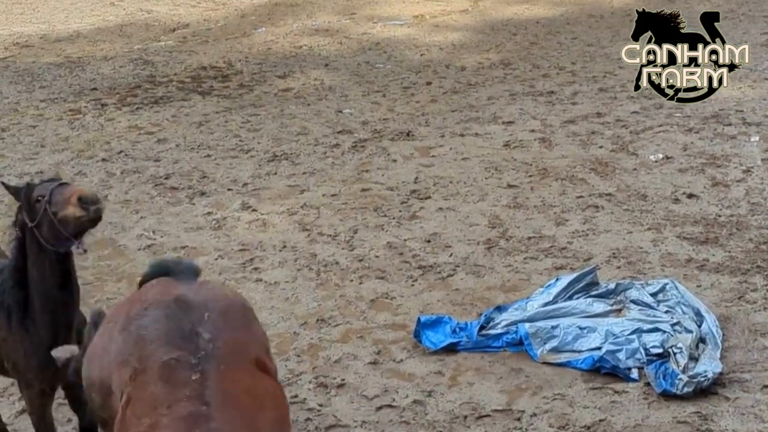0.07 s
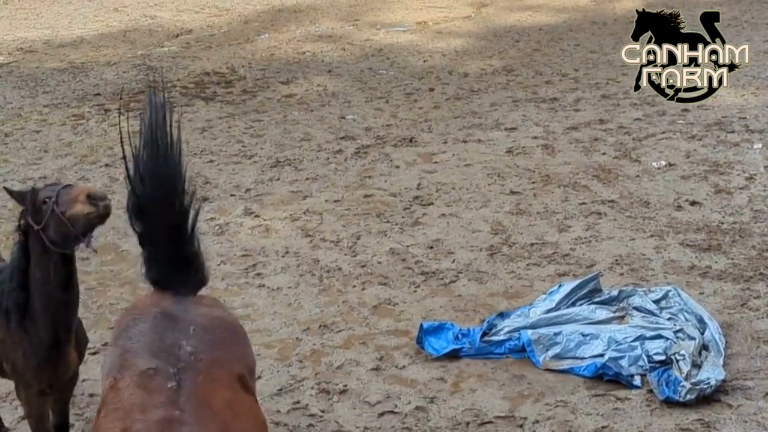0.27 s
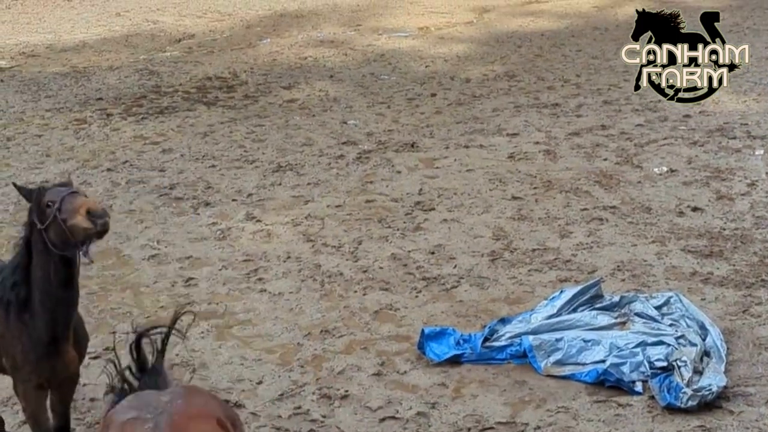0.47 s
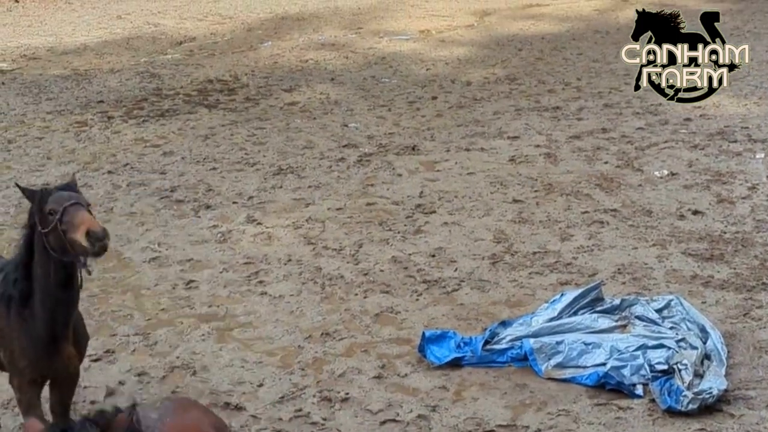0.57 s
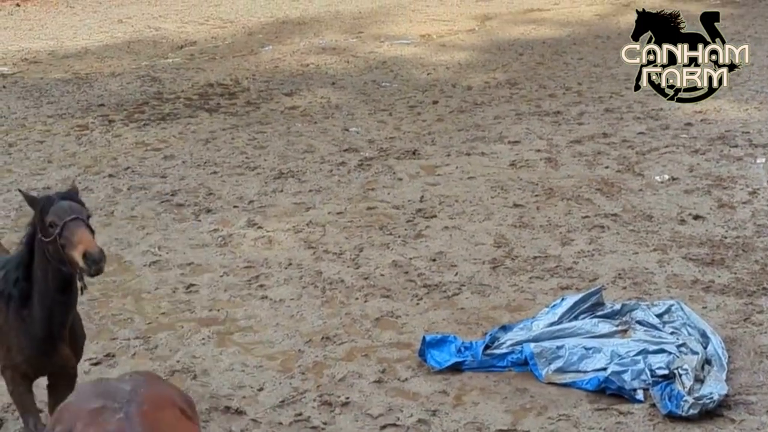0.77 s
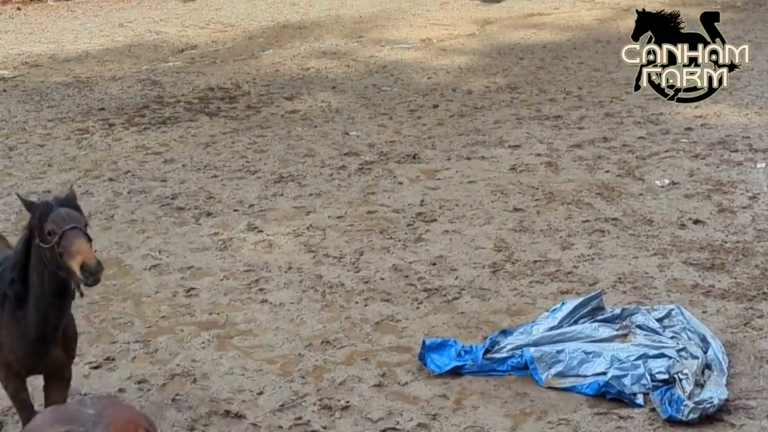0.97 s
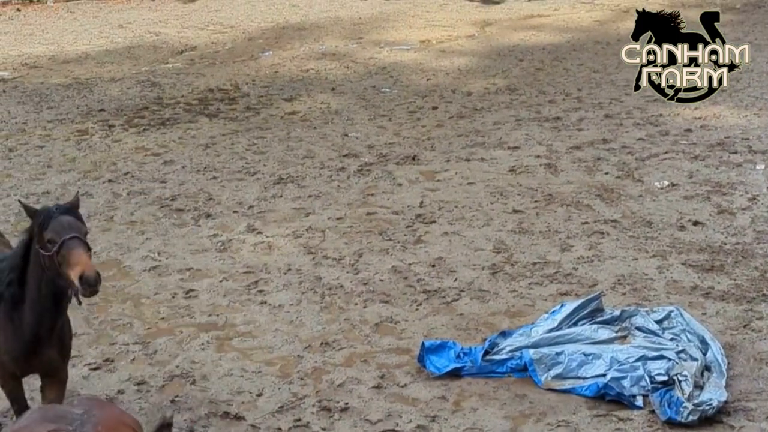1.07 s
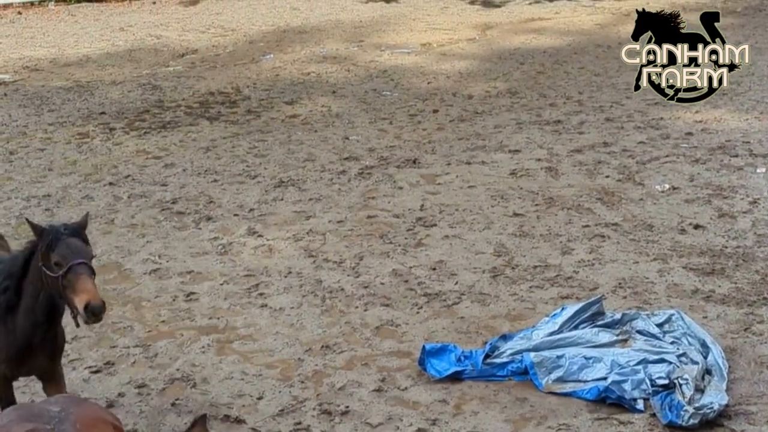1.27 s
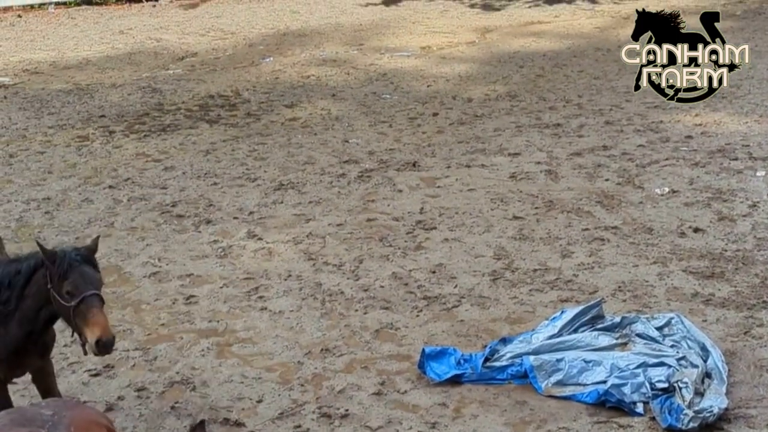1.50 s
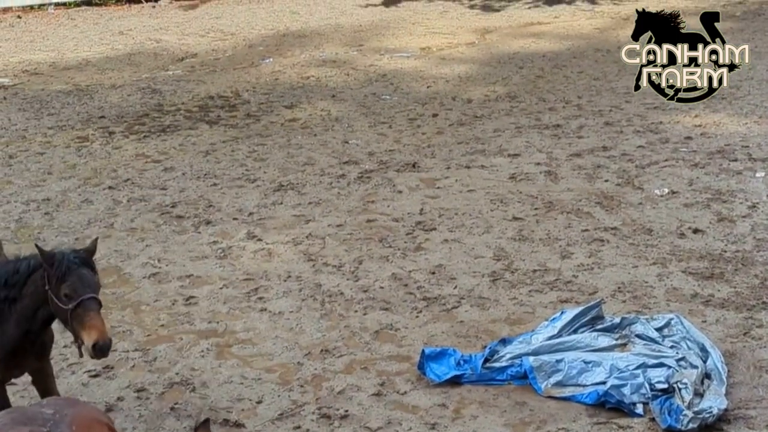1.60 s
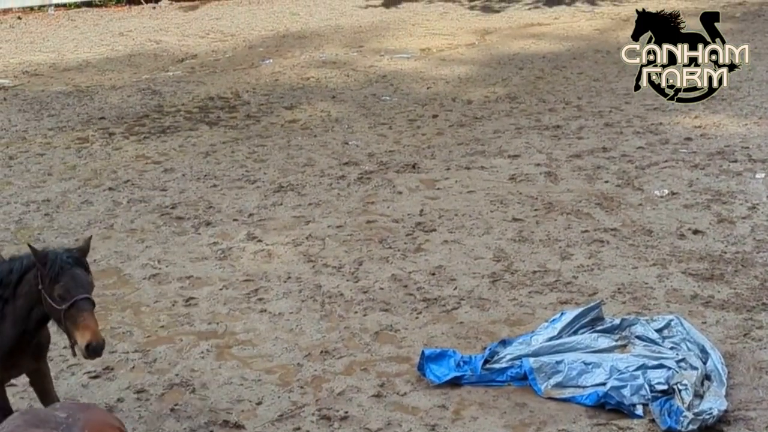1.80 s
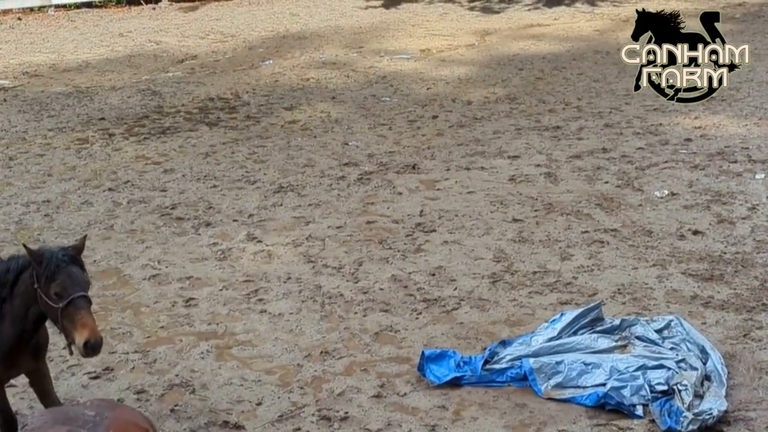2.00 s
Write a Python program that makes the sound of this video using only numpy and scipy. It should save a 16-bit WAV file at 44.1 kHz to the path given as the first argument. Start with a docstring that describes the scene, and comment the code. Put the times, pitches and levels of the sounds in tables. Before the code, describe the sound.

A nearby horse gives a short, low grunt after a faint tail swish, then lands with a thud and a snort. Soft steps, scuffs and scattering sand follow, over the faint hiss and rumble of an outdoor paddock.

```python
"""A horse bucks close by in a sandy paddock, over a quiet outdoor hiss and rumble.
A faint nasal squeak and a swish of the tail come first. One short rattling grunt follows:
pulse trains excite the resonances of throat and nose. Then the hooves thump down and the horse
snorts, a burst of noise modulated by its flapping nostrils. Sand sprays and settles,
and soft steps, scuffs and ticks of grit end the scene."""
import sys
import numpy as np
from scipy import signal
from scipy.fft import rfft, irfft
from scipy.io import wavfile
from scipy.ndimage import uniform_filter1d

SR = 44100
rng = np.random.default_rng(int(sys.argv[2]) if len(sys.argv) > 2 else 0)


def unload_wav(signal):
    """Save mono or channel-first audio to the path in sys.argv[1] as 16-bit WAV at rate SR, clipped to [-1, 1]."""
    wavfile.write(
        sys.argv[1],
        SR,
        np.round(np.clip(np.atleast_2d(signal).T, -1, 1) * 32767).astype(np.int16),
    )


N = 90404
TIME = np.arange(N) / SR
FREQS = np.maximum(np.fft.rfftfreq(N, 1 / SR), 1)
LOW_CUT_HZ, HIGH_CUT_HZ = 46, 15650


def from_db(db):
    """Amplitude ratio of a level in decibels."""
    return 10 ** (np.asarray(db) / 20)


def unit_rms(x):
    """Normalisation to unit power."""
    return x / np.sqrt(np.mean(x ** 2) + 1e-20)


def over_time(rows):
    """Linear interpolation in time, one curve per column after the first."""
    times, *columns = np.transpose(rows)
    return [np.interp(TIME, times, column) for column in columns]


def over_hz(points):
    """Interpolation on a log-frequency axis."""
    hz, value = np.transpose(points)
    return np.interp(np.log(FREQS), np.log(hz), value)


def pan(balance_db):
    """Stereo placement by level difference, left minus right."""
    return from_db(np.array([[.5], [-.5]]) * balance_db)


def filtered(x, hz, kind, order=2):
    """Causal Butterworth filtering."""
    sos = signal.butter(order, np.minimum(hz, SR / 2 - 100), kind, fs=SR, output="sos")
    return signal.sosfilt(sos, x + 1e-18)


def impulse(start_s):
    """A unit impulse."""
    return 1. * (np.arange(N) == int(start_s * SR))


def ring(drive, hz, t60):
    """Damped resonator: a unit impulse starts a decaying unit sine, whose pitch may move."""
    turn = np.exp(2j * np.pi * np.cumsum(hz * np.ones(N)) / SR)
    decay = np.exp(-np.log(1000) / (t60 * SR))
    return np.imag(turn * signal.lfilter([1], [1, -decay], drive / turn + 1e-18))


def swell(peak_s, level_db, rise_s, fall_s):
    """Exponential growth to a peak, then exponential decay."""
    return from_db(level_db) * np.exp(np.minimum((TIME - peak_s) / rise_s, (peak_s - TIME) / fall_s))


def waver(samples):
    """Slow random modulation: a moving average of white noise."""
    return unit_rms(uniform_filter1d(rng.standard_normal(N), size=samples))


def sand_grains(signs, per_s=5000, spread_db=3, bands=16):
    """Shot noise: random impacts, each sounding in one of several frequency bands."""
    sizes = from_db(spread_db * np.minimum(rng.exponential(1, (2, N)), 5)) * signs
    impacts = sizes * (rng.random((2, N)) < per_s / SR)
    edges_hz = np.linspace(LOW_CUT_HZ, HIGH_CUT_HZ, bands + 1)
    band = rng.integers(0, bands, N)
    return unit_rms(sum(filtered(impacts * (band == k), edges_hz[k:k + 2], "band", order=1)
                        for k in range(bands)))


# Left minus right level of nearby sounds: frequency_hz, balance_db
NEAR_BALANCE = [(700, 0.5), (1300, -12), (2400, -5), (4400, -2), (8000, 0.5), (15000, 3)]
# Likeness of the two channels: frequency_hz, correlation
COHERENCE = [(300, 0.72), (1200, 0.12), (4500, 0.21), (8500, 1), (14000, 0.98)]
def noise(spectrum, balance=NEAR_BALANCE, grain_share=0):
    """Partially coherent stereo noise of unit power, smooth or partly granular."""
    source = rng.standard_normal((2, N))
    if grain_share:
        grains = sand_grains(np.sign(source))
        source = np.sqrt(grain_share) * grains + np.sqrt(1 - grain_share) * rng.standard_normal((2, N))
    mid, side = rfft(source)
    coherence = over_hz(COHERENCE)
    stereo = np.sqrt(1 + coherence) * mid + np.sqrt(1 - coherence) * side * [[1], [-1]]
    return unit_rms(irfft(stereo * from_db(over_hz(spectrum)) * pan(over_hz(balance)), N))


# Spectra of the hiss and the rumble: frequency_hz, gain_db
HISS_SPECTRUM = [(250, -2.5), (700, -9.5), (1000, -0.5), (2050, 1.5), (2700, -2.5), (4500, -9.5),
                 (6800, -5.5), (8200, -12.5), (10000, -24.5), (15500, -35)]
RUMBLE_SPECTRUM = [(45, 5.5), (60, 11), (85, -5), (130, -4.5), (400, -38)]
# Rumble envelope: time_s, level_db
RUMBLE_ENVELOPE = [(0, -51), (.4, -52), (.8, -57.5), (2.05, -58.5)]
# Left minus right level of the background: frequency_hz, balance_db
FAR_BALANCE = [(1500, -2.5), (8000, -4.5), (15000, -3)]
def outdoors(hiss_db=-62):
    """Ambient noise: a stationary far hiss and a low rumble that eases off."""
    rumble_db, = over_time(RUMBLE_ENVELOPE)
    hiss = noise(HISS_SPECTRUM, FAR_BALANCE) * from_db(hiss_db)
    return hiss + noise(RUMBLE_SPECTRUM, FAR_BALANCE) * from_db(rumble_db)


def echoes(x, level_db=-25, t60_s=1):
    """Diffuse scattering from the ground and the paddock's edges adds a faint, dull tail."""
    tail = filtered(rng.standard_normal((2, N)), 3500, "low") * np.exp(-np.log(1000) * TIME / t60_s)
    tail /= np.sqrt(np.sum(tail ** 2, axis=1, keepdims=True))
    return from_db(level_db) * signal.fftconvolve(filtered(x, 303, "high"), tail, axes=1)[:, :N]


# Faint low tones: start_s, length_s, start_hz, end_hz, level_db
CREAK_TONES = [(-.012, .034, 215, 200, -45), (.708, .046, 250, 305, -51), (.36, .11, 160, 165, -55)]
def creaks():
    """Random frequency modulation roughens short gliding tones."""
    out = 0
    for start_s, length_s, start_hz, end_hz, level_db in CREAK_TONES:
        progress = np.clip((TIME - start_s) / length_s, 0, 1)
        hz = (start_hz + (end_hz - start_hz) * progress) * (1 + .074 * waver(200))
        tone = np.sin(2 * np.pi * np.cumsum(hz) / SR)
        balance_db = np.interp(start_hz, *np.transpose(NEAR_BALANCE))
        out = out + pan(balance_db) * from_db(level_db) * np.sin(np.pi * progress) * tone
    return out


# Spray envelope: time_s, level_db
SAND_ENVELOPE = [(0, -59), (.1, -57), (.15, -67.5), (.3, -64), (.47, -60), (.55, -52), (.62, -54.5),
                 (.72, -57), (.77, -62), (1.1, -70.5), (1.45, -72), (1.945, -82), (1.995, -61.5)]
# Spray spectrum: frequency_hz, gain_db
SAND_SPECTRUM = [(300, 8), (1200, -11.5), (2000, 7), (2900, -0.5), (4000, -1), (8300, -1.5), (10000, -12),
                 (12000, -5.5), (15500, -19)]
def thrown_sand():
    """Superposition of many tiny impacts makes a grainy hiss."""
    level_db, = over_time(SAND_ENVELOPE)
    return noise(SAND_SPECTRUM, grain_share=.65) * from_db(level_db)


# Hoof drags: peak_s, level_db, rise_s, fall_s
DRAGS = [(0.1, -51.5, 0.0059, 0.028), (.49, -55.5, 0.12, 0.033), (0.666, -52, 0.037, 0.094),
         (1.44, -59, 0.34, 0.095)]
# Drag spectrum: frequency_hz, gain_db
DRAG_SPECTRUM = [(300, -11), (800, -4), (1200, -6.5), (1550, -7.5), (2000, 1.5), (2600, -29.5), (4000, -9),
                 (9000, -68)]
def scuffs():
    """Sliding friction of hooves on sand gives swells of granular noise."""
    return noise(DRAG_SPECTRUM, grain_share=.65) * sum(swell(*row) for row in DRAGS)


# Sweeps of tail and sand: peak_s, level_db, rise_s, fall_s
SWEEPS = [(0.098, -49, 0.0077, .019), (0.895, -52.5, 0.014, 0.016), (0.936, -53, 0.019, 0.059),
          (1.299, -53, 0.099, .045), (2.034, -59, 0.011, 0.017)]
# Sweep spectrum: frequency_hz, gain_db
SWEEP_SPECTRUM = [(450, -8.5), (1000, -2), (2600, 0.5), (4000, 3.5), (6800, 2), (8500, -3.5), (10000, -19),
                  (12000, -10), (15500, -41)]
def swishes():
    """Broadband friction noise swells and fades as tail and sand sweep by."""
    return noise(SWEEP_SPECTRUM) * sum(swell(*row) for row in SWEEPS)


# Struck grit and small stones: start_s, level_db, pitch_hz, grit_t60_s
STONE_HITS = [(.393, -37, 2680, 0.014), (.514, -35.5, 1844, 0.055), (0.526, -27.5, 5100, .0036),
              (0.5836, -40, 10100, 0.0068), (.938, -36.5, 1720, 0.013), (1.02, -39.5, 1383, 0.071),
              (1.055, -39.5, 1900, 0.018), (1.1687, -41, 1660, 0.041), (2.003, -44.5, 2000, .025)]
def stone_ticks():
    """Impact excitation: a stone rings briefly inside a decaying crunch of grit."""
    out = 0
    for start_s, level_db, hz, t60 in STONE_HITS:
        stone = ring(impulse(start_s), hz, t60 / 2)
        decay = (TIME >= start_s) * np.exp(-np.log(1000) * np.abs(TIME - start_s) / t60)
        grit = unit_rms(filtered(rng.standard_normal(N), [hz / 2, hz * 1.15], "band"))
        out = out + from_db(level_db) * filtered(.5 * stone + .35 * grit * decay, hz / 2, "high")
    return out * pan(balance_db=-7)


# Hooves and weight landing on sand: start_s, level_db, cutoff_hz
FOOTFALLS = [(.118, -42, 134), (0.342, -33, 178), (0.5221, -28, 270), (0.5274, -19, 126),
             (0.583, -30, 55.5), (0.934, -45.5, 150.6), (1.032, -33.5, 50.5), (1.249, -42.5, 53),
             (1.445, -39, 51.7)]
def hoof_thuds():
    """A soft impact is a low-passed impulse: the softer the contact, the lower the cutoff."""
    out = 0
    for start_s, level_db, cutoff_hz in FOOTFALLS:
        push = filtered(impulse(start_s), cutoff_hz, "low", order=3)
        out = out - from_db(level_db) * push / push.max()
    return out


def resonances(drive, modes):
    """Modal superposition: each mode is panned, and high-passed to keep the valley below it dark."""
    return sum(filtered(ring(drive, hz, t60), hz / 2, "high", order=1) * from_db(db) * pan(balance_db)
               for hz, db, t60, balance_db in modes)


GRUNT_START_S, GRUNT_END_S = .2033, .294
# Nasal resonances: pitch_hz, gain_db, t60_s, balance_db
NOSE_MODES = [(1038, -33, 0.039, -8.5), (1176, -34, 0.046, -6), (2078, -40.5, 0.041, -13),
              (3080, -48, 0.019, -3)]
def nose(drive, sag_per_s=.18, edge_ratio=1.21):
    """Band-limited formants sink in pitch as the push of air fades."""
    sag = 1 - sag_per_s * (np.clip(TIME, GRUNT_START_S, GRUNT_END_S) - GRUNT_START_S)
    out = 0
    for hz, gain_db, t60, balance_db in NOSE_MODES:
        formant = filtered(ring(drive, hz * sag, t60), [hz / edge_ratio, hz * edge_ratio], "band")
        out = out + formant * from_db(gain_db) * pan(balance_db)
    return out


def squeak():
    """Noise excitation: a small push of air sounds the two lowest nasal modes."""
    tone = unit_rms(resonances(rng.standard_normal(N), NOSE_MODES[:2]))
    return tone * swell(peak_s=.031, level_db=-47, rise_s=.0093, fall_s=.013)


# Whistles as the grunt opens and closes: peak_s, level_db, rise_s, fall_s
WHISTLE_SWELLS = [(0.206, -44, 0.0047, 0.0079), (0.271, -46.5, 0.0052, 0.0084)]
def whistles():
    """A narrow nostril resonance filters breath noise into a pitch."""
    tone = unit_rms(ring(rng.standard_normal(N), hz=3600, t60=.016))
    return tone * sum(swell(*row) for row in WHISTLE_SWELLS)


# Spectrum of the expelled air: frequency_hz, gain_db
SNORT_SPECTRUM = [(200, 4.5), (600, 0.5), (1250, -5.5), (2000, -3), (2700, -8.5), (6700, -10),
                  (9500, -21.5), (12000, -20.5), (15500, -28)]
def snort(peak_s=.5285, flap_hz=171, flap_depth=.39):
    """Amplitude modulation: flapping nostrils chop a sharp puff of air."""
    flap = 1 + flap_depth * np.cos(2 * np.pi * flap_hz * (TIME - peak_s))
    return noise(SNORT_SPECTRUM) * flap * swell(peak_s, level_db=-34.5, rise_s=.016, fall_s=.0089)


def pulses(hz, jitter=.0028):
    """Quasi-periodic excitation: one impulse per slightly uneven cycle while the grunt lasts."""
    sounding = (TIME >= GRUNT_START_S) & (TIME < GRUNT_END_S)
    cycles = np.cumsum(sounding * hz * (1 + jitter * waver(256))) / SR
    return np.diff(np.ceil(cycles), prepend=0)


# Slow throat beats, faster flutter and breath: time_s, flutter_hz, beat_db, flutter_db, breath_db
THROAT_DRIVE = [(.197, 232, -16, -11.5, -37), (.211, 241, -21, -5, -50.5), (.216, 245.7, -12, 0.5, -44),
                (.226, 225.1, 4, -6, -39.5), (.240, 156.4, 3, -0.5, -48), (.262, 262, -2, -11.5, -40),
                (.277, 275, -8, -37.5, -46), (.294, 248, -34, -18.5, -52)]
# Sharp closures that rattle through the nose: time_s, rate_hz, level_db
NOSE_DRIVE = [(.212, 181.1, 1), (.222, 142.4, 3), (.231, 133.1, -9.5), (.243, 133, 2), (.253, 94.7, -5.5),
              (.262, 129.8, -9), (.292, 152, -36)]
# Throat resonances: pitch_hz, gain_db, t60_s, balance_db
THROAT_MODES = [(173, -31.5, 0.06, 2.5), (238.8, -23, 0.064, 0), (268.4, -31.5, 0.11, -2.5),
                (500, -47, 0.027, -15), (640, -74, 0.03, 0)]
def grunt(beat_hz=53.16, throat_lag_s=.00185, puff_s=.003, shut_s=.0067):
    """Source and filter: beats and flutter ring the throat, sharp closures ring the nose."""
    flutter_hz, beat_db, flutter_db, breath_db = over_time(THROAT_DRIVE)
    rattle_hz, rattle_db = over_time(NOSE_DRIVE)
    drive = pulses(beat_hz) * from_db(beat_db) + pulses(flutter_hz) * from_db(flutter_db)
    delayed_drive = np.interp(TIME - throat_lag_s, TIME, drive)
    closures = pulses(rattle_hz)
    voice = resonances(delayed_drive, THROAT_MODES) + nose(closures * from_db(rattle_db))
    # Air leaks just before the voice, then puffs at each closure
    puffs = .5 + .8 * signal.lfilter([1], [1, -np.exp(-1 / (puff_s * SR))], closures)
    breath = breath_noise() * puffs * from_db(breath_db) * (TIME > THROAT_DRIVE[0][0])
    damping = np.exp(-np.maximum(TIME - GRUNT_END_S, 0) / shut_s)  # the throat shuts
    return damping * (voice + breath)


# Spectrum of the grunt's breath: frequency_hz, gain_db
BREATH_SPECTRUM = [(200, 2.5), (780, -10), (1100, 3.5), (1500, -8.5), (2080, -7), (2700, -16), (3500, -4),
                   (4300, -21), (6000, -12), (15000, -41)]
def breath_noise():
    """Turbulent airflow gives noise with broad formant peaks."""
    return noise(BREATH_SPECTRUM)


def scene():
    """Superposition of horse, ground and background; voice, creaks and ticks also echo."""
    echoing = grunt() + whistles() + squeak() + creaks() + snort() + stone_ticks()
    return echoing + echoes(echoing) + hoof_thuds() + swishes() + scuffs() + thrown_sand() + outdoors()


def record(dry):
    """Band limiting: a steep low cut that rings after each thud, and a cut at the top."""
    low_cut = signal.cheby1(6, 1, LOW_CUT_HZ, "high", fs=SR, output="sos")
    high_cut = signal.ellip(12, .1, 80, HIGH_CUT_HZ, fs=SR, output="sos")
    return signal.sosfilt(high_cut, signal.sosfilt(low_cut, dry))


dry = scene()
out = record(dry)
unload_wav(out)
```